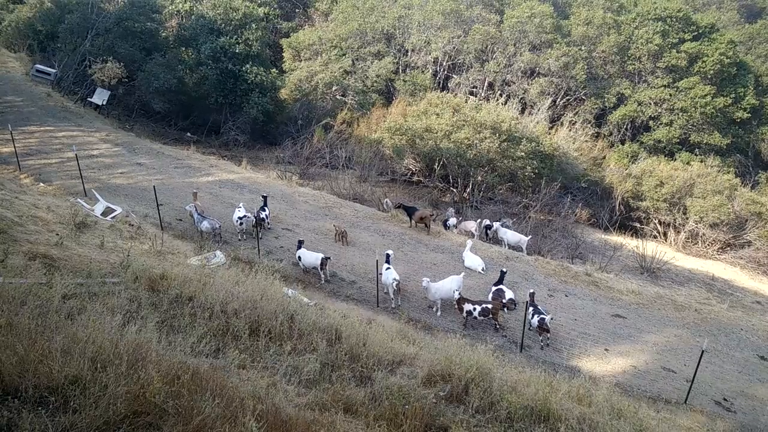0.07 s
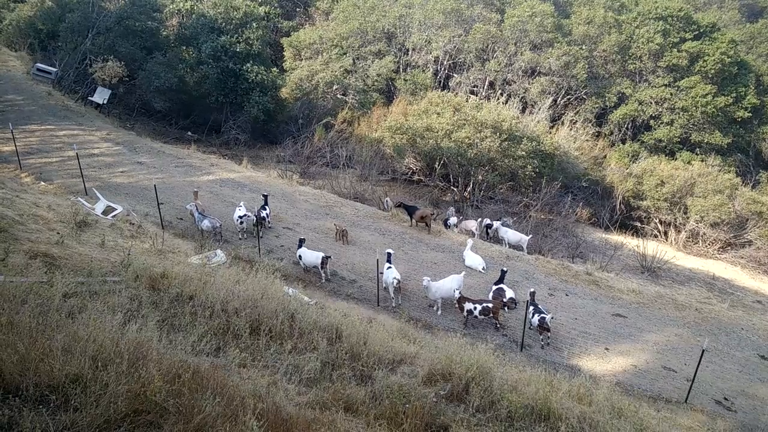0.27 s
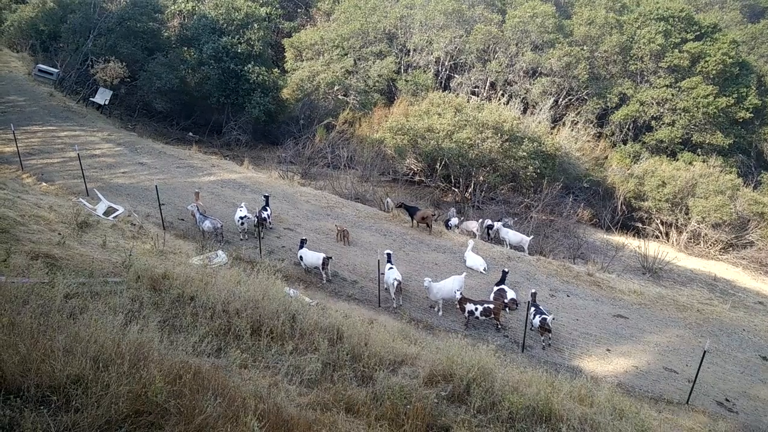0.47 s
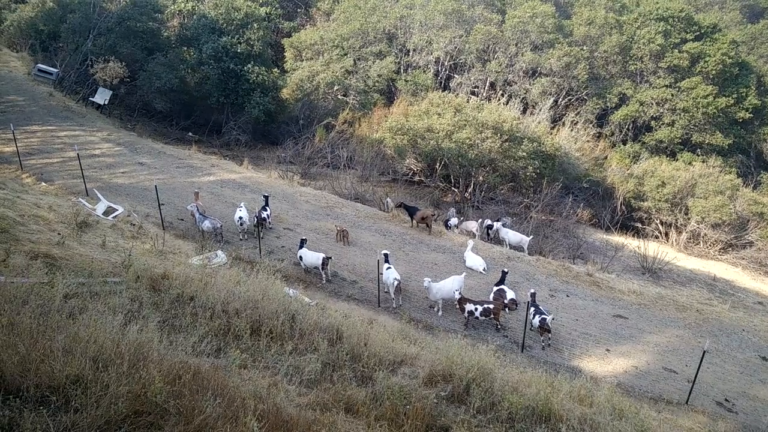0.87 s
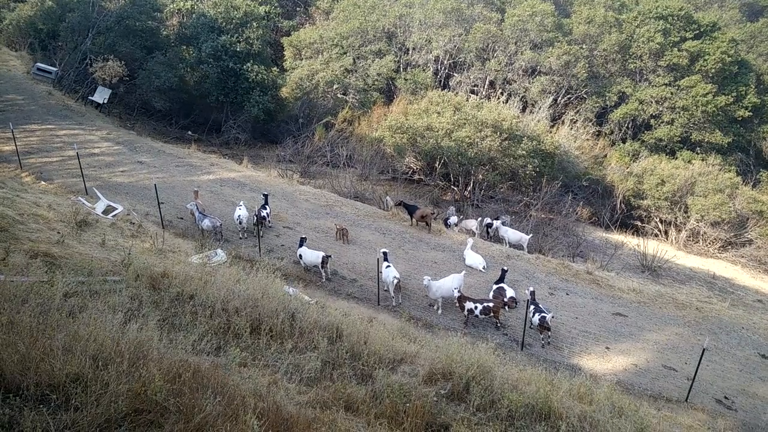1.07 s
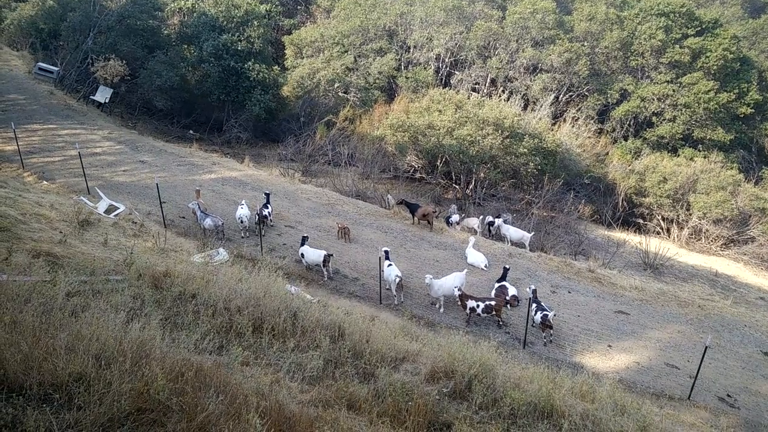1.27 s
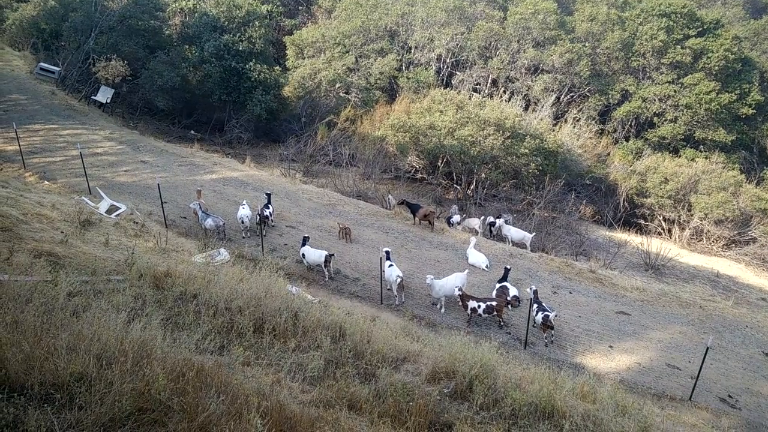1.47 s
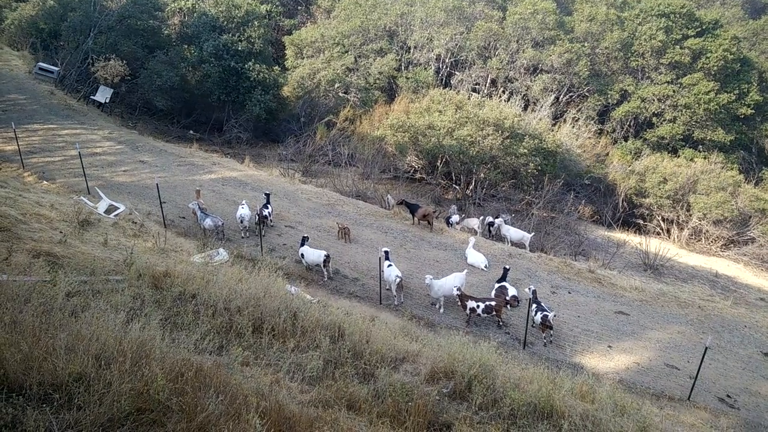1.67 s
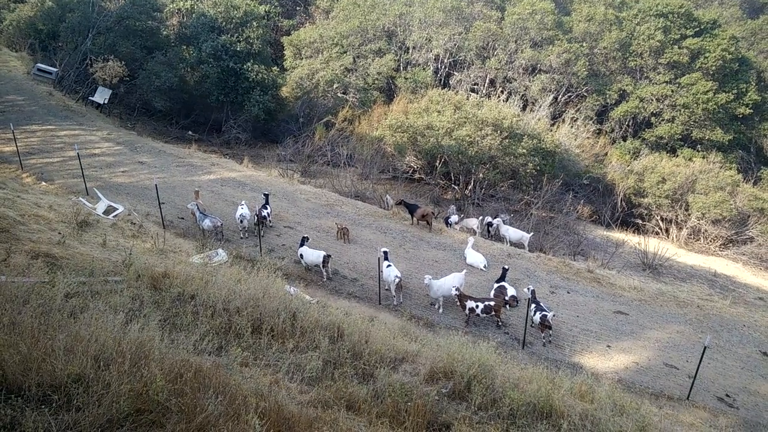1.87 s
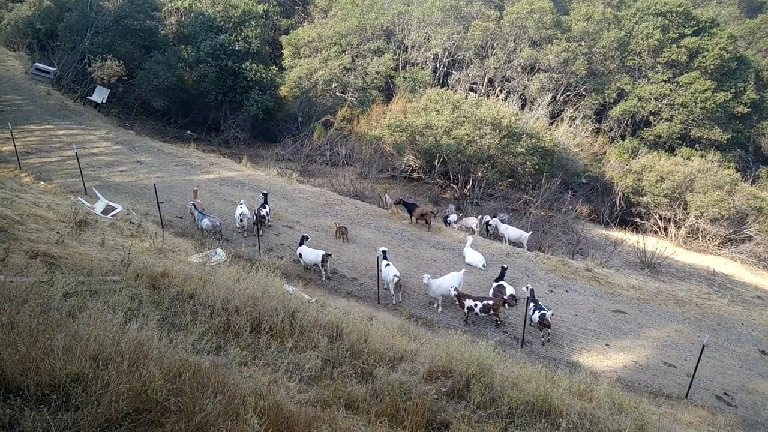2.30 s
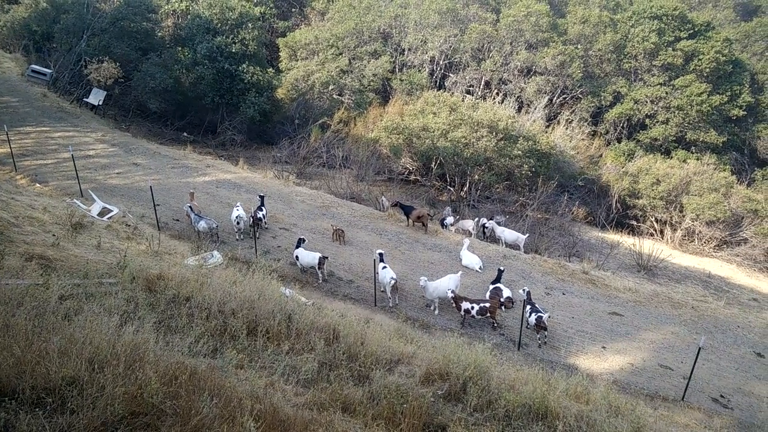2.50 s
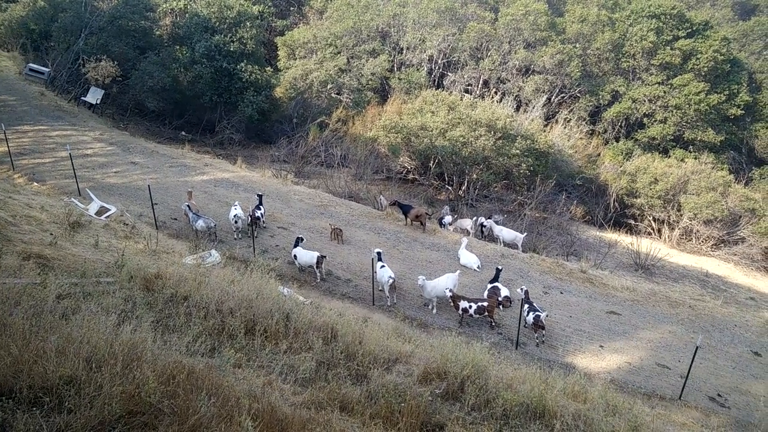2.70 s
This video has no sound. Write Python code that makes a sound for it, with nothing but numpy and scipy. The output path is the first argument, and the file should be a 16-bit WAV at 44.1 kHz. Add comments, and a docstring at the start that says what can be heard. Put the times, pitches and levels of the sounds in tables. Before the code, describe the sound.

Goat bleats, one hoarse, one loud and quavering, one weak, with light wind behind.

```python
"""A goat's low, hoarse stutter comes first, from a hillside left of the microphone. A loud quavering cry
overlaps its end, and a short weak bleat follows. Each is the buzz and rasp of vocal folds, with its own
tone colour; the slope and the trees answer. Two soft bumps sound close to the microphone during
the cry. Faint wind rumbles throughout with a low hum in it, and two thin tones drift by far off."""
import sys
import numpy as np
from scipy import signal
from scipy.fft import rfft, irfft, next_fast_len
from scipy.io import wavfile
from scipy.ndimage import map_coordinates

SR = 44100
rng = np.random.default_rng(int(sys.argv[2]) if len(sys.argv) > 2 else 0)


def log_audio(samples):
    """Write samples as a 16-bit WAV file to the path given in sys.argv[1]."""
    # one column per channel
    frames = np.atleast_2d(samples).T
    # limit to full scale, then quantise
    limited = np.clip(frames, -1, 1)
    pcm = np.round(limited * 32767).astype(np.int16)
    wavfile.write(sys.argv[1], SR, pcm)


N = 125685

# crests and dips of the cry; the voice cracks as it drops: t/s, f/Hz, level/dB, roughness/0-1
CRY_QUAVER = [(.53, 434.6, -75, 0.24), (.565, 457.4, -59, 0), (.596, 423.6, -55.5, 0.41),
              (.654, 500.5, -40.5, 0.42), (.685, 456.4, -40, 0.13), (.731, 509, -39, 0.16),
              (.76, 490.3, -37, 0), (.814, 521.3, -38, 0.19), (.843, 482, -36, 0.1),
              (.892, 515.7, -38, 0.25), (.92, 469, -37, 0.41), (.977, 522.1, -36.5, 0.37),
              (.997, 452.4, -39.5, 0.85), (1.06, 517.2, -37.5, 0.24), (1.077, 461.7, -39.5, 0.63),
              (1.098, 435, -50.5, 0.5), (1.122, 449, -39.5, 0.38), (1.168, 501.6, -37.5, 0.29),
              (1.19, 444.8, -46, 0.34), (1.21, 440.7, -43, 0.59), (1.233, 446.7, -42.5, 0.2),
              (1.274, 494, -38, 0.33), (1.3, 430.3, -52, 0.56), (1.346, 419.6, -47, 0.15),
              (1.375, 399, -55, 0.14), (1.41, 387, -85, 0.01)]
# pulses of the stutter and of the weak bleat: crest t/s, f/Hz, level/dB, half length/s
STUTTER_PULSES = [(.034, 338.8, -55.5, 0.022), (.136, 352.3, -55, 0.022), (.234, 357.3, -53.5, 0.022),
                  (.329, 348.4, -54.5, 0.028), (.428, 338, -52.5, 0.029), (.53, 342.6, -52.5, 0.03),
                  (.63, 338, -51.5, .028)]
WEAK_PULSES = [(2.257, 407, -63.5, .022), (2.356, 458, -45.5, .018), (2.448, 467.6, -40.5, .022),
               (2.561, 418, -44.5, .02)]
# tone colour of each bleat as heard at the microphone: f/Hz, relative level/dB
CRY_COLOUR = [(300, -32), (500, -24.5), (840, -15.5), (1030, -3), (1200, -14.5), (1380, 0.5), (1620, -13),
              (1900, -17), (2250, -19.5), (2570, -3.5), (2850, -21.5), (3150, -14.5), (3550, -10.5),
              (4150, -16), (5000, -2.5), (5450, -10.5), (5950, 6), (6600, -3.5), (7800, 6.5), (8600, -3),
              (9700, -7.5), (10600, -23), (13000, -39), (16000, -89)]
STUTTER_COLOUR = [(200, -7), (345, -5), (520, -7.5), (700, -13.5), (1040, 2.5), (1400, -19), (1800, -19),
                  (2400, -10), (2800, -21), (3250, -9), (3900, -10.5), (5100, -5), (6200, -9),
                  (7200, -14.5), (8300, -15), (10200, -32), (14000, -39.5)]
WEAK_COLOUR = [(300, -30), (430, -38), (840, -5.5), (1100, -10.5), (1350, -3.5), (1750, -17), (2200, -25),
               (2530, 1.5), (3000, -28), (3600, -5), (4200, -9), (4800, 1), (5200, -4.5), (5800, 2),
               (6600, -2.5), (7800, 10), (8800, -11), (9800, -14), (11000, -26), (15000, -51)]
# shadow on the microphone's right side: f/Hz, level/dB against the left
RIGHT_SHADOW = [(400, 1.5), (750, 10), (1000, -11), (1450, 2), (1900, -2), (2500, -27), (4200, -31.5),
                (6400, -63.5), (10000, -55)]
STUTTER_RIGHT_SHADOW = [(350, 1.5), (700, -0.5), (1050, -10.5), (1600, -9), (2500, -22), (4400, -36),
                        (8000, -38)]
# quick scatter off the slope: f/Hz, level/dB against the direct sound
SLOPE_SCATTER = [(500, -13), (1000, -6.5), (1450, -3), (2500, -7.5), (7000, -6.5)]
# decay of the trees' answer: f/Hz, t60/s
TREES_DECAY = [(300, 0.25), (2500, 0.74), (7500, 0.51), (12000, 0.56)]
# bumps close to the microphone: t/s, envelope peak level/dB
CLOSE_BUMPS = [(0.907, -49.5), (.9255, -43)]
# wind spectrum: f/Hz, relative level/dB
WIND_SPECTRUM = [(22, -57), (35, -34), (50, -4.5), (100, -7), (125, -7.5), (160, -12.5), (315, -16.5),
                 (480, -23.5), (800, -26.5), (1800, -32.5), (3500, -40), (5200, -39), (7300, -35.5),
                 (10000, -41), (15500, -40)]
# likeness of the wind on left and right: f/Hz, coherence/0-1
WIND_COHERENCE = [(60, 0.95), (250, 0.91), (600, 0.32), (1500, 0), (5000, 0)]
# faint tones in the distance: t/s, f/Hz, level/dB
FAR_DRONE = [(1.1, 364.6, -81), (1.35, 378, -74.5), (1.55, 385, -75.5), (1.7, 400, -80.5), (1.95, 414, -76),
             (2.2, 405, -88.5)]
FAR_WHISTLE = [(1.55, 3950, -105), (1.68, 3584, -89.5), (1.85, 3400, -95), (1.98, 3450, -93),
               (2.1, 3400, -105)]

TOP_HZ, BRIGHT_HZ = 15800, 3330  # upper band limit; edge of the voice's treble
SMEAR_S = .0032  # the highest overtones trail the lowest, blunting each vocal pulse
RIGHT_LAG_S = .00031  # the goats reach the microphone's right side later


def goats():
    """Three bleats from off to the left: the hoarse stutter, the loud cry and the weak one."""
    stutter = bleat(*pulsing(STUTTER_PULSES, squareness=2.3), STUTTER_COLOUR, STUTTER_RIGHT_SHADOW,
                    jitter=.02875, rasp=1.0, shimmer_db=3.5, low_power=.86, trees_db=-8)
    cry = bleat(*glide(CRY_QUAVER), CRY_COLOUR, RIGHT_SHADOW,
                jitter=.013, rasp=.86, shimmer_db=5, low_power=.68, trees_db=-14)
    weak = bleat(*pulsing(WEAK_PULSES, squareness=1.7), WEAK_COLOUR, RIGHT_SHADOW,
                 jitter=.0126, rasp=.51, shimmer_db=1.5, low_power=.57, trees_db=-8.5)
    return stutter + cry + weak


def bleat(hz, gain, rough, colour, shadow, jitter, rasp, shimmer_db, low_power, trees_db):
    """One call, from goat to microphone: the folds' buzz takes on its colour and effort brightens it."""
    source = vocal_folds(hz, jitter * rough, rasp * rough)
    voice = unit(filtered(source, lambda f: tone_colour(colour, f)))
    voice *= amp(shimmer_db * rough * wobble(130))
    high = filtered(voice, treble)
    effort = gain / gain.max()
    call = high * effort + (voice - high) * effort ** low_power  # soft notes are duller
    left, right = hillside(gain.max() * call, trees_db)
    right = filtered(right, lambda f: amp(along(shadow, f)) * np.exp(-2j * np.pi * f * RIGHT_LAG_S))
    return np.array([left, right])


def vocal_folds(hz, jitter, rasp, low_share=.2):
    """The folds pulse unevenly and let through a puff of mostly treble noise once a cycle."""
    phase = 2 * np.pi * np.cumsum(hz * (1 + jitter * wobble(300))) / SR
    harmonics = range(1, int(TOP_HZ / hz.min()) + 1)
    buzz = unit(sum(np.cos(k * phase) * (k * hz < TOP_HZ) for k in harmonics))
    puffs = unit(rng.standard_normal(N) * (1 + np.cos(phase)) ** 2)
    puffs = filtered(puffs, lambda f: low_share + (1 - low_share) * treble(f))
    return (buzz + rasp * puffs) / np.hypot(1, rasp)


def tone_colour(colour, hz):
    """A bleat's peaks and dips as a minimum-phase response, plus a delay that grows with frequency."""
    cepstrum = irfft(np.log(amp(along(colour, hz))))
    half = len(cepstrum) // 2
    cepstrum[1:half] *= 2
    cepstrum[half + 1:] = 0
    return np.exp(rfft(cepstrum)) * np.exp(-1j * np.pi * SMEAR_S * hz ** 2 / TOP_HZ)


def pulsing(rows, squareness, fall_db=6.5, pitch_sag=.04, crest_rough=.62):
    """Pitch, gain and roughness of a bleat in pulses: highest, loudest and cleanest on each crest."""
    crest_s, hz, db, half_s = np.transpose(rows)[:, :, None]
    away = np.minimum(np.abs(np.arange(N) / SR - crest_s) / half_s, 10)  # half lengths from each crest
    gains = amp(db - fall_db * np.minimum(away ** squareness, 20))
    pitches = hz * (1 - pitch_sag * np.minimum(away, 2) ** 2)
    rough = np.interp(away.min(0), [0, 1], [crest_rough, 1])
    return (pitches * gains).sum(0) / gains.sum(0), gains.sum(0), rough


def hillside(call, trees_db, scatter_s=.016):
    """Direct sound on both sides, quick scatter from the slope and a longer answer from the trees."""
    hz, t, noise = signal.stft(rng.standard_normal((2, SR // 2)), SR, nperseg=256)
    decay = amp(-60 * t / along(TREES_DECAY, hz)[:, None])
    trees = signal.istft(noise * decay, SR, nperseg=256)[1]
    slope = rng.standard_normal(trees.shape) * np.exp(-np.arange(trees.shape[1]) / SR / scatter_s)
    echo = lambda tail: signal.fftconvolve(call[None], tail / np.linalg.norm(tail[0]), axes=1)[:, :N]
    scatter = filtered(echo(slope), lambda f: amp(along(SLOPE_SCATTER, f)))
    return call + scatter + amp(trees_db) * echo(trees)


def bumps(hz=388, width_s=.0013):
    """Soft, dull knocks of a cycle or two, close to the microphone."""
    t = np.arange(N) / SR
    return sum(amp(db) * np.exp(-((t - s) / width_s) ** 2 / 2) * np.sin(2 * np.pi * hz * (t - s))
               for s, db in CLOSE_BUMPS)


def wind(level_db=-62.5):
    """A gently swelling rumble, alike on both sides of the microphone, under a thin even hiss."""
    air = rng.standard_normal((2, N))
    swell = amp(.83 * wobble(8.03)) - 1
    air += filtered(air * swell, lambda f: 1 / (1 + (f / 400) ** 2))  # the swell is in the lows
    spread = lambda f: np.arccos(np.clip(along(WIND_COHERENCE, f), -1, 1)) / 2
    shape = lambda f: amp(along(WIND_SPECTRUM, f)) * [np.cos(spread(f)), np.sin(spread(f))]
    mid, side = filtered(air, shape)
    return amp(level_db) * unit(np.array([mid + side, mid - side]))


def faint_tone(hz, gain, waver):
    """A background tone that wavers in pitch and level."""
    flutter = amp(2.5 * wobble(14))
    phase = 2 * np.pi * np.cumsum(hz * (1 + waver * wobble(40))) / SR
    return gain * unit(np.sin(phase) * flutter)


def glide(rows):
    """Pitch, gain and any further controls per sample, easing from row to row; silent outside."""
    times, *columns = np.transpose(rows)
    t = np.arange(N) / SR
    index = np.arange(len(times))
    place = np.interp(t, times, index)
    eased = np.floor(place) + (1 - np.cos(np.pi * (place % 1))) / 2
    hz, db, *rest = [np.interp(eased, index, column) for column in columns]
    return (hz, amp(db) * (t > times[0]) * (t < times[-1]), *rest)


def treble(hz):
    """High-pass response with its edge at BRIGHT_HZ."""
    return hz ** 6 / (hz ** 6 + BRIGHT_HZ ** 6)


def wobble(rate):
    """A smooth random curve, rate knots a second."""
    return map_coordinates(rng.standard_normal(int(N * rate / SR) + 4), [np.arange(N) * rate / SR])


def filtered(x, response):
    """x through a complex response of frequency."""
    size = 2 * next_fast_len(N)
    return irfft(rfft(x, size) * response(np.fft.rfftfreq(size, 1 / SR)), size)[..., :N]


def along(points, hz):
    """Rows of f/Hz, value, interpolated on a log frequency axis."""
    f, values = np.transpose(points)
    return np.interp(np.log(hz + 1), np.log(f + 1), values)


def amp(db):
    """Decibels to gain."""
    return 10 ** (np.asarray(db) / 20)


def unit(x):
    """Scaled to rms 1."""
    return x / np.sqrt(np.mean(x ** 2) + 1e-20)


def scene():
    """Goats to the left and bumps up close, over wind, a low hum and far tones."""
    hum = faint_tone(hz=120, gain=amp(-67.5), waver=.043)
    far_tones = faint_tone(*glide(FAR_DRONE), waver=.012) + faint_tone(*glide(FAR_WHISTLE), waver=.006)
    return goats() + bumps() + wind() + hum + far_tones


def record(dry):
    """The microphone channels pass nothing above their band limit."""
    return filtered(dry, lambda hz: hz < TOP_HZ)


dry = scene()
out = record(dry)
log_audio(out)
```